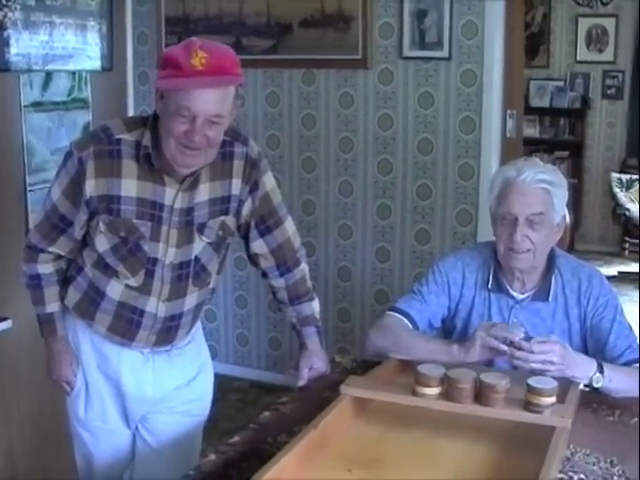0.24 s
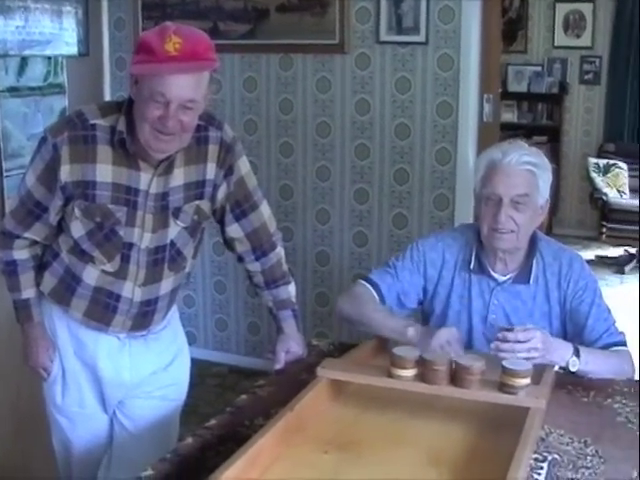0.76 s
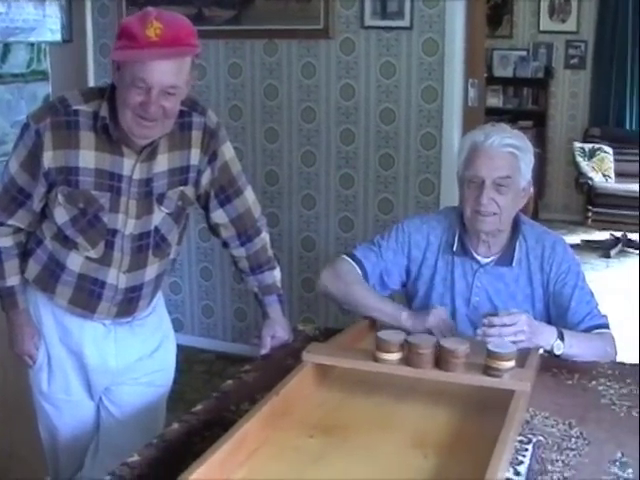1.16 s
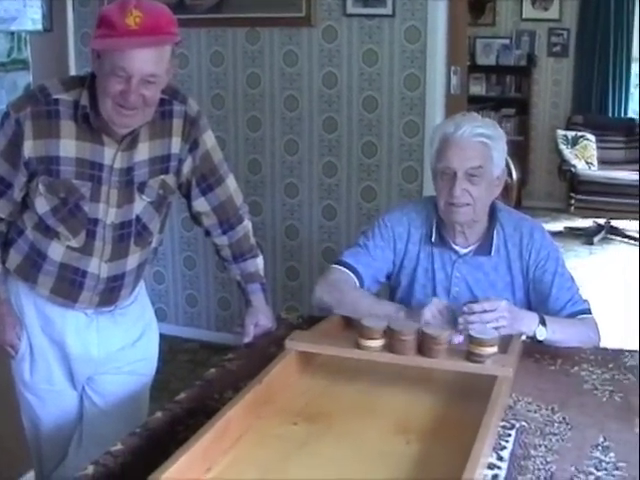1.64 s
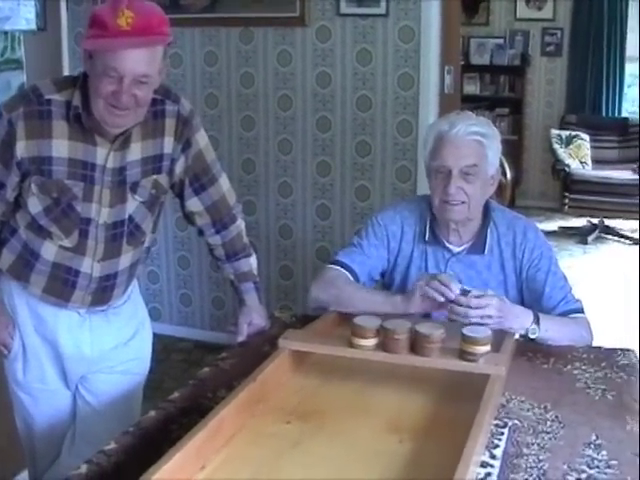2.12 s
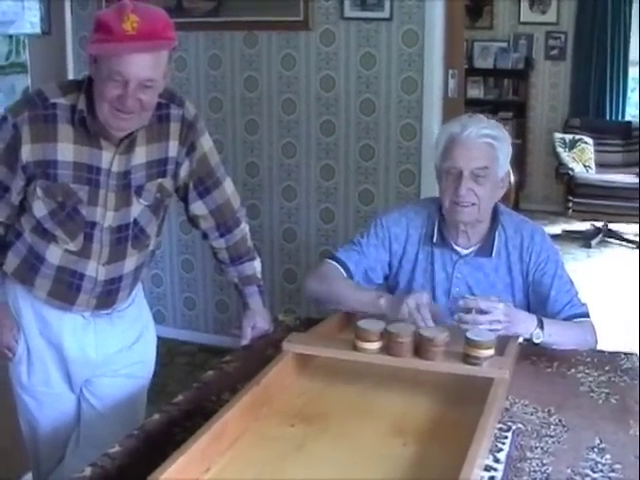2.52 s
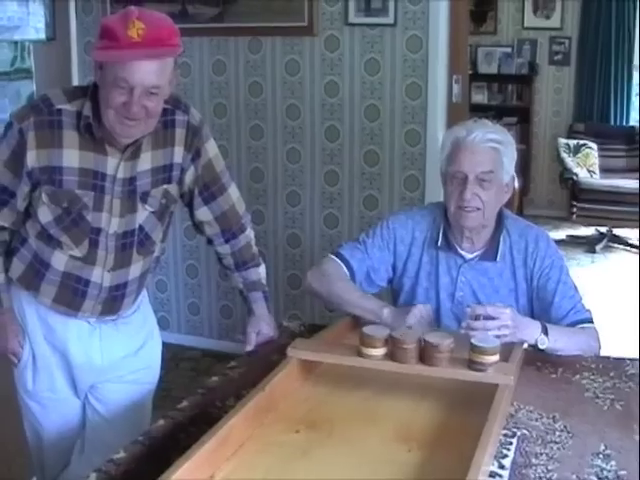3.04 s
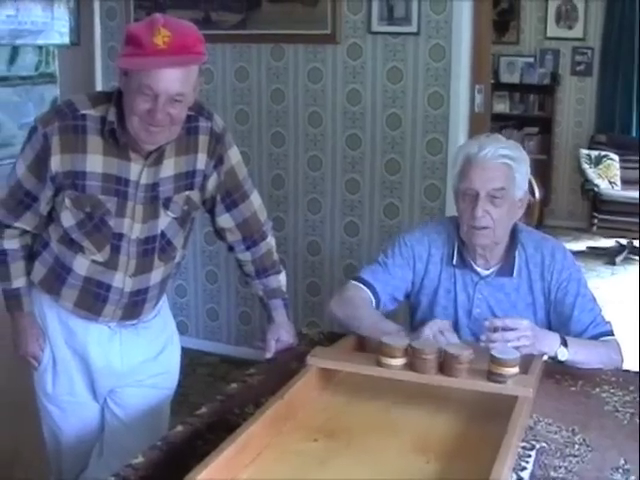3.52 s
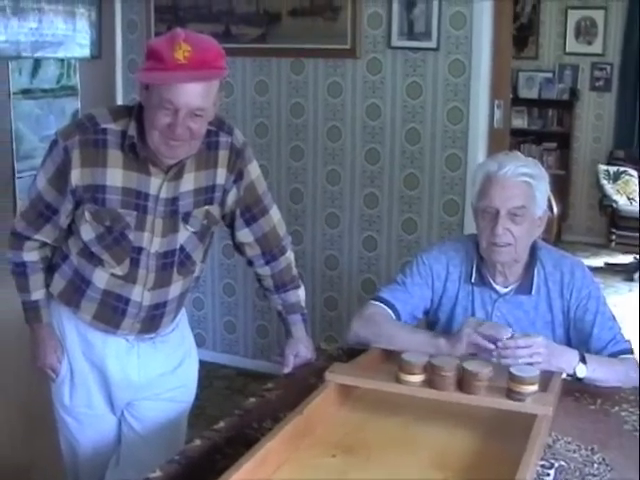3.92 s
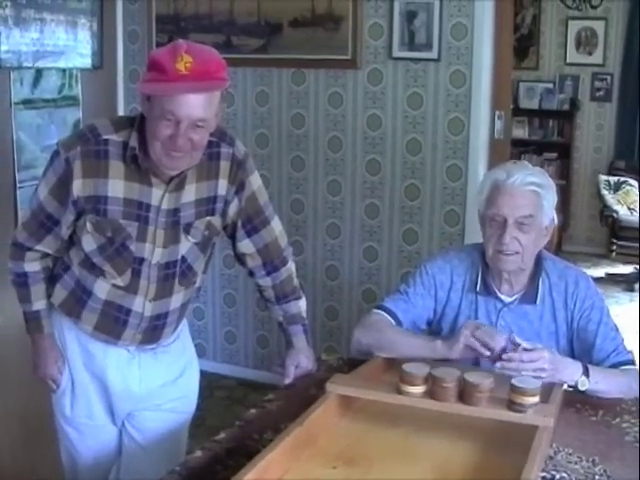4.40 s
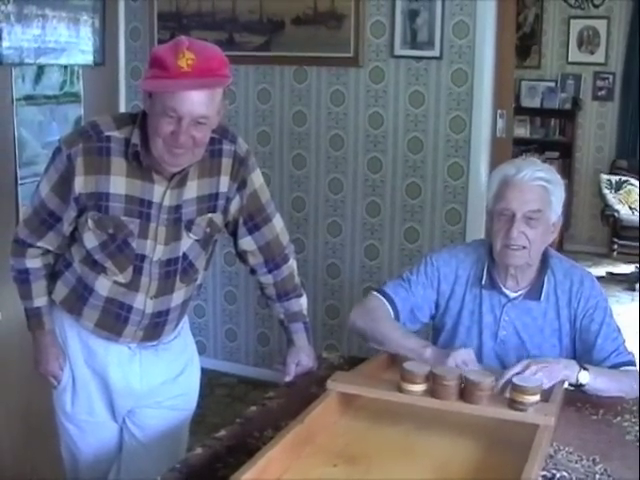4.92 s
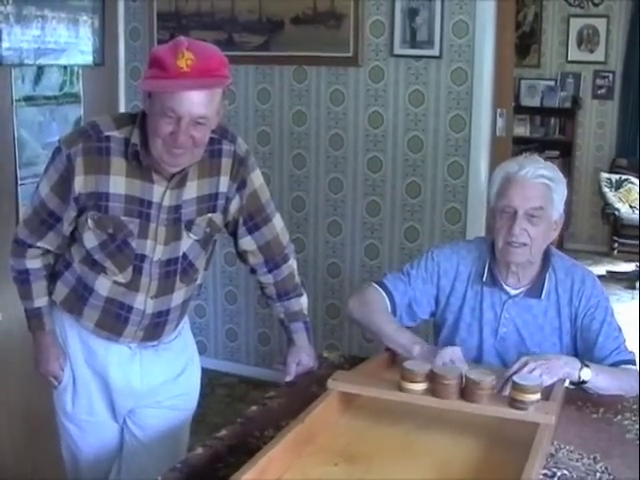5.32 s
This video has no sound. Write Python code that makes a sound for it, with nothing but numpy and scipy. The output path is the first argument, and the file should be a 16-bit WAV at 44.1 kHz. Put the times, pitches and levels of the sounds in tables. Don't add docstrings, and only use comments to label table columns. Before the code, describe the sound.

A small living room heard in stereo through a hissy tape camera with a faint steady whine. At the very start a wooden disc's slide fades within a third of a second, leaving faint hand rustle. A hard, woody clack with a low board ring lands at 0.95, followed by light taps and a soft push. From 1.4 to 1.9 a firm scraping slide rattles with crowded clacks, a tiny falling squeak and two split-second drop-outs; a double knock at 1.87 sends a disc running until about 2.1. After quiet, strong knocks hit at 2.74 and 2.88. Faint pushes and a brisk dry scrape follow from 3.0 to 3.7, with a brief drop-out just before clustered clacks at 3.75 and a run-out fading by 4.3. Two more sharp knocks come at 4.78 and 4.94, then a quick cluster from 5.2 to 5.3 and a short closing slide.

```python
import sys
import numpy as np
from scipy import signal
from scipy.fft import rfft, irfft, next_fast_len
from scipy.io import wavfile
from scipy.ndimage import uniform_filter1d

SR = 44100
rng = np.random.default_rng(int(sys.argv[2]) if len(sys.argv) > 2 else 0)


def gain_from_db(level_db):
    decades = np.asarray(level_db, float) / 20
    return 10 ** decades


def master_out(mix):
    frames = np.transpose(np.atleast_2d(mix))
    ceiling = np.clip(frames, -1, 1)
    pcm = np.round(ceiling * 32767).astype(np.int16)
    wavfile.write(sys.argv[1], SR, pcm)


N = 245195


def evened(x):
    return x / np.sqrt(np.mean(x ** 2) + 1e-20)


def peak_one(x):
    return x / abs(x).max()


def read(points, hz):
    f, value = np.transpose(points)
    return np.interp(np.log(hz + 1), np.log(f + 1), value)


def coloured(x, spectrum):
    hz = np.fft.rfftfreq(len(x), 1 / SR)
    return irfft(rfft(x) * gain_from_db(read(spectrum, hz)), len(x))


def add(mix, start, sound):
    part = mix[round(start * SR):][:len(sound)]
    part += sound[:len(part)]


# f/Hz, level/dB per Hz
HISS_SPECTRUM = [(15, -46.5), (25, -19), (43, -1), (130, -6), (624, -7), (1200, -11), (3000, -15),
                 (16000, -19.5)]
# f/Hz, likeness [0-1]
HISS_LIKENESS = [(60, 0), (180, 0.53), (550, 1), (1650, 0.07), (4970, 0), (15000, 0)]


def hiss():
    hz = np.fft.rfftfreq(1024, 1 / SR)
    a, b, c, d, patches = rng.standard_normal((N // 256 + 5, 513, 5)).T
    patches = evened(uniform_filter1d(uniform_filter1d(patches, 10, 0), 10, 1))
    same = np.clip(read(HISS_LIKENESS, hz), 0, 1)[:, None]
    left = a + 1j * b
    right = same * left + np.sqrt(1 - same ** 2) * (c + 1j * d)
    z = np.array([left, right]) * gain_from_db(read(HISS_SPECTRUM, hz)[:, None] + 1.3 * patches)
    noise = signal.istft(z, nperseg=1024, noverlap=768)[1][:, :N]
    return gain_from_db(-60) * noise / np.sqrt(np.mean(noise.mean(0) ** 2))


# f/Hz, level/dB rms
WHINE_TONES = [(1050, -77), (1200, -78), (1500, -79.5), (2100, -77), (2400, -75), (2850, -78), (3300, -80),
               (3450, -73), (3600, -82), (3750, -78), (7500, -81), (7800, -83), (8700, -84), (10800, -77),
               (15625, -76)]


def whine():
    t = np.arange(N) / SR
    flutter = evened(uniform_filter1d(uniform_filter1d(rng.standard_normal(N), 3000), 3000))
    out = np.zeros(N)
    for hz, db in WHINE_TONES:
        phase = 2 * np.pi * (hz * t + rng.random()) + 0.21 * flutter
        out += np.sqrt(2) * gain_from_db(db) * np.sin(phase)
    return out


# f/Hz, t60/s
ROOM_DECAY = [(250, 0.79), (600, 0.35), (1400, 0.39), (3700, 0.29), (9700, 0.47)]
# f/Hz, likeness [-1 to 1]
ROOM_LIKENESS = [(100, .9), (420, 1), (700, 0.94), (1200, 0.32), (2500, 0.51), (6000, -.2), (9000, -0.56),
                 (13000, -.2)]


def room_tail(length):
    taps = np.zeros((2, length))
    at = np.arange(60, length - 20, 20) + rng.integers(0, 20, (2, (length - 61) // 20))
    np.put_along_axis(taps, at, rng.choice([-1., 1.], at.shape), 1)
    hz, t, (a, b) = signal.stft(taps, SR, nperseg=256)
    half = np.arccos(np.clip(read(ROOM_LIKENESS, hz), -1, 1))[:, None] / 2
    middle, side = np.cos(half) * a, np.sin(half) * b
    z = np.array([middle + side, middle - side])
    decay = gain_from_db(-60 * t / read(ROOM_DECAY, hz)[:, None])
    tail = signal.istft(z * decay, SR, nperseg=256)[1]
    tail = tail * (np.arange(len(t) * 128 - 128) > 50)
    return tail / np.linalg.norm(tail[0])


def room(x):
    out = np.zeros((2, N))
    turn = np.arange(N) / SR * 4.3
    for k in range(3):
        tail = room_tail(SR // 2)
        share = np.sqrt(2 / 3) * np.cos(np.pi * (turn + k / 3))
        out += signal.fftconvolve((x * share)[None], tail, axes=1)[:, :N]
    return out


# f/Hz, phase/rad
LEFT_LEAD = [(100, 0), (2000, .1), (5000, .45), (7000, .9), (8900, 2.3), (10500, 1.2), (12000, 2.4),
             (16000, 0)]


def ports(x):
    hz = np.fft.rfftfreq(N, 1 / SR)
    half = np.exp(.5j * read(LEFT_LEAD, hz))
    return irfft(rfft(x) * np.array([half, 1 / half]), N)


def rubbing(per_s, spread_db, smooth):
    size_db = spread_db * np.minimum(rng.exponential(1, N), 4)
    happens = rng.random(N) < per_s / SR
    slips = happens * rng.choice([-1, 1], N) * gain_from_db(size_db)
    return evened(evened(slips) + smooth * rng.standard_normal(N))


RUMBLE_SPECTRUM = [(400, -19), (600, 8.5), (900, 3), (1400, 0.5), (2000, -16.5), (2800, -42.5)]
BOOM_SPECTRUM = [(200, -28), (300, -1), (400, 12), (520, -0.5), (700, -38)]
FACE_SPECTRUM = [(1300, -14), (2000, 4.5), (3000, -0.5), (4500, 3), (6000, -3.5), (7500, -46.5)]
GRAIN_SPECTRUM = [(4000, -30), (6000, -7), (7700, 0), (9600, -5), (10800, -22), (11800, -26), (12800, -15),
                  (13500, -24), (14200, -50)]
# boom level/dB against the rumble, grain dryness/dB, then rows of t/s, pressure level/dB, speed [0-1]
FREE_RUNS = [
    (-3, 1.5, [(0.0, -20, 0.07), (.034, -24, 0.2), (.1, -34.5, 0.38), (.18, -34.5, 0.33), (.224, -39, 0.19), (.262, -44, 0), (.36, -92, 0.8)]),
    (-11, -1.5, [(1.89, -25.5, 0.46), (1.92, -20, 0.28), (1.962, -30.5, 0.35), (2.024, -31.5, 0.32), (2.09, -32.5, 0.15), (2.154, -50, 0.15), (2.3, -87, 0.3)]),
    (-1.5, 5, [(3.78, -36, 0.6), (3.832, -25.5, 0.38), (3.85, -33, 0.6), (3.904, -33.5, 0.63), (3.915, -24.5, 0.14), (4.07, -43.5, 0.52), (4.1, -37.5, 0.3), (4.254, -56, 0), (4.4, -58.5, 0.07)]),
    (-11, -5, [(5.33, -14.5, 0.16), (5.35, -37, 0.58), (5.484, -58.5, .75), (5.56, -39, 0.76)]),
]
HAND_PUSHES = [
    (-12, -4, [(1.13, -43.5, .02), (1.21, -43.5, 0.67), (1.29, -35.5, 0.62), (1.33, -42.5, 0.62), (1.36, -47, 0.82), (1.38, -75, 0.27)]),
    (-9.5, -1.5, [(1.4, -40, 0.69), (1.416, -34.5, 0.68), (1.444, -32.5, 0.6), (1.484, -24, 0.43), (1.6, -24, 0.49), (1.68, -23.5, 0.44), (1.75, -22.5, 0.65), (1.796, -23, 0.34), (1.82, -21.5, 0.14)]),
    (-16, -4.5, [(2.95, -36.5, 0.14), (3.092, -49, 0.49), (3.186, -36, 0.74), (3.318, -39, 0.73), (3.36, -40, 0.68)]),
    (-3, 3, [(3.375, -43, 0.79), (3.398, -35.5, 1), (3.424, -35, 0.67), (3.586, -46, 1), (3.7, -37.5, 0.54)]),
    (-11, -4, [(5.0, -47.5, 0.87), (5.054, -65, 0.93), (5.128, -50.5, 0.61), (5.17, -39, 0.44)]),
]
HAND_REACHES = [
    (2.5, -.1, [(.45, -66.5, 0.25), (.65, -56.5, 0.08), (.78, -53.5, .02), (.86, -55.5, .02), (.92, -50.5, .02)]),
    (-1, -0.061, [(2.55, -79, .4), (2.668, -67, 0.27), (2.71, -51, 0.023)]),
    (12.5, -.1, [(4.42, -68, 0.21), (4.55, -75.5, 0.33), (4.718, -75, 0.31), (4.74, -63, .25)]),
]
# middle t/s, half length/s, level/dB
FINGER_BRUSHES = [
    (.33, .03, -66),
    (2.065, .04, -45),
    (2.42, .05, -59),
    (4.46, .06, -66),
]


def slides():
    hz, t, z = signal.stft(rubbing(1800, 2.5, .8), SR, nperseg=512, noverlap=384)
    rumble, boom, scrape, grain = (
        evened(gain_from_db(read(spectrum, hz)))[:, None]
        for spectrum in (RUMBLE_SPECTRUM, BOOM_SPECTRUM, FACE_SPECTRUM, GRAIN_SPECTRUM))
    field = np.zeros(z.shape)
    for boom_db, dry_db, rows in FREE_RUNS + HAND_PUSHES + HAND_REACHES:
        s, *columns = np.transpose(rows)
        pressure_db, speed = (np.interp(t, s, column) for column in columns)
        scrape_db = -15.5 + 26.5 * speed
        grain_db = dry_db - 24.5 + 34.5 * speed
        face_hz = 2800 + 1250 * speed
        fade_in = t - s[0] + 0.016 + (s[0] < .01)
        fade_out = s[-1] + 0.022 - t
        edge = np.clip(np.minimum(fade_in, fade_out) / 0.018, 0, 1)
        face = scrape * (1 + 0.94 * np.exp(-((hz[:, None] - face_hz) / 800) ** 2))
        face = face / np.sqrt((face ** 2).mean(0))
        parts = rumble + gain_from_db(boom_db) * boom + gain_from_db(scrape_db) * face + gain_from_db(grain_db) * grain
        add(field, 0, edge * gain_from_db(pressure_db) * parts)
    rocks = 1.494 + .06 * np.arange(4)[:, None]
    field = field * gain_from_db(8 * np.exp(-((t - rocks) / .011) ** 2).sum(0))
    brush = evened(np.exp(-((hz[:, None] - 7700) / 600) ** 2))
    for s, half_s, db in FINGER_BRUSHES:
        add(field, 0, gain_from_db(db) * brush * np.exp(-((t - s) / half_s) ** 4))
    patches = rng.standard_normal(z.shape[::-1]).T
    patches = evened(uniform_filter1d(uniform_filter1d(patches, 4, 0), 12, 1))
    return signal.istft(z * field * gain_from_db(2.8 * patches), SR, nperseg=512, noverlap=384)[1][:N]


def squeak():
    start_s, length_s, from_hz, to_hz = 1.4, 0.0245, 1550, 1228
    u = np.arange(round(length_s * SR)) / (length_s * SR)
    hz = from_hz + (to_hz - from_hz) * u
    uneven = 1 + 0.76 * np.cos(2 * np.pi * 4.5 * u)
    swell = np.sin(np.pi * u ** 3.0)
    out = np.zeros(N)
    add(out, start_s, gain_from_db(-22) * swell * uneven * np.sin(2 * np.pi * np.cumsum(hz) / SR))
    return out


def ring(modes, phases, seconds):
    hz, db, t60 = np.transpose(modes)[:, :, None]
    t = np.arange(round(seconds * SR)) / SR
    return (gain_from_db(db - 60 * t / t60) * np.sin(2 * np.pi * hz * t + phases[:, None])).sum(0)


# f/Hz, level/dB, t60/s
FLEX_MODES = [(347, -8.5, 0.2), (418.5, -1, 0.21), (464.6, 0.5, .13)]
# t/s, level/dB
SET_DOWNS = [
    (.944, -15.5),
    (2.737, -9.5),
    (3.744, -20),
    (4.775, -19.5),
    (5.196, -19.5),
]


def thuds():
    out = np.zeros(N)
    sound = peak_one(ring(FLEX_MODES, np.zeros(len(FLEX_MODES)), .3))
    for s, db in SET_DOWNS:
        add(out, s + 0.0013, gain_from_db(db) * sound)
    return out


def bent(x, spread_s):
    hz = np.fft.rfftfreq(x.shape[-1], 1 / SR)
    late = 2 * spread_s * (np.sqrt(1000 * hz) - hz / 10)
    return irfft(rfft(x) * np.exp(-2j * np.pi * late), x.shape[-1])


# f/Hz, level/dB, t60/s
BOARD_MODES = [(252, -21, 0.067), (287, -7, 0.15), (387, 4, 0.079), (745, 9, 0.068), (1350, 3, 0.13),
               (2080, -7, 0.2), (2800, -12.5, 0.05)]
# multiple of its pitch, level/dB
DISC_PARTIALS = [(1, 7.5), (.62, -1.5), (1.55, -6.5), (2.1, -8)]
# f/Hz, level/dB
PUSH_SPECTRUM = [(500, -16.5), (1000, -5.5), (1600, -1), (2500, -1), (4000, -5.5), (5500, -11.5),
                 (8000, -20.5), (11000, -43.5)]
# delay t/s, gain
RAIL_ECHOES = [(0, 0.94), (.0007, -1.1), (.0016, 0.87), (.0029, .5), (.0044, -0.22)]


def knock(peak_db, board_db, clack_db, tick_db, hz, rise_s, chance):
    t = np.arange(round(.3 * SR)) / SR
    table = np.array(BOARD_MODES)
    jitter, weight, phase = chance[:150].reshape(3, 50)
    mode_hz = np.linspace(16, 53, len(jitter)) ** 2 * (1 + .03 * jitter)
    mode_db = read(table[:, :2], mode_hz) + 1.1 * weight
    modes = np.transpose([mode_hz, mode_db, read(table[:, ::2], mode_hz)])
    board = ring(modes, 3 * phase, .3) * (1 - np.exp(-t / 0.00093))
    partials = [(hz * k, db, .005 + 8 * rise_s) for k, db in DISC_PARTIALS]
    disc = ring(partials, chance[150:154], .3)
    noise = chance[200:200 + len(t)]
    swell = 1 - np.exp(-(t / rise_s) ** 2)

    echoes = np.zeros(len(t))
    for (s, gain), c in zip(RAIL_ECHOES, chance[160:]):
        echoes += gain * np.exp(-((t - .0006 - s * (1 + .15 * c)) * SR) ** 2)
    push = coloured(echoes, PUSH_SPECTRUM) * (rise_s < .001)
    crackle = coloured(noise, PUSH_SPECTRUM) * np.exp(-t / (0.0052 + rise_s))
    tick_decay = np.exp(-t / (0.00074 + rise_s)) + 0.15 * np.exp(-t / .02)
    tick = coloured(noise[::-1], GRAIN_SPECTRUM) * tick_decay

    clack = 1.1 * push / (abs(push).max() + 1e-9)
    clack = clack + swell * (0.35 * peak_one(disc) + 0.38 * peak_one(crackle))
    rest = gain_from_db(board_db) * peak_one(swell * board) + gain_from_db(tick_db) * peak_one(swell * tick)
    room_to_spread = np.zeros(400)
    late = bent(np.array([np.append(part, room_to_spread) for part in (clack, rest)]), .003)
    return gain_from_db(peak_db) * (gain_from_db(clack_db) * peak_one(late[0]) + late[1])


# t/s, clack level/dB, board ring level/dB, disc pitch f/Hz
SHARP_BLOWS = [(0.944, -6.5, -5.5, 1895), (1.051, -22.5, -16.5, 1940), (1.091, -23, -17, 1910),
               (1.495, -9, -29, 2290), (1.671, -11.5, -23.5, 2400), (1.743, -18, -41, 2670),
               (1.755, -9, -44, 3130), (1.784, -14, -18, 3190), (1.866, -5, -12, 2250),
               (1.874, -9, -15, 2310), (1.915, -38, -38, 3500), (2.134, -37, -80, 2322),
               (2.737, -5.5, -1.5, 1880), (2.881, -3.5, -11, 2600), (3.018, -33.5, -46, 3650),
               (3.744, -10, -7, 2080), (3.759, -8, -36, 2700), (3.765, -9.5, -17, 2315),
               (3.84, -21.5, -14, 3070), (3.912, -20.5, -31, 2230), (3.941, -26, -33, 2600),
               (4.082, -36.5, -36.5, 2164), (4.775, -4, -5.5, 1960), (4.936, -4.5, -10, 2610),
               (5.196, -2.5, -8.5, 2380), (5.217, -9.5, -10, 2200), (5.302, -8, -13, 2020)]
GLANCING_BLOWS = [(1.053, -44, -33, 1080), (1.108, -27.5, -26.5, 1980), (1.386, -32, -33.5, 1600),
                  (1.408, -26, -44, 1266), (1.469, -20.5, -14, 2540), (1.494, -17.5, -18.5, 2600),
                  (1.557, -11, -24, 2400), (1.618, -13, -20.5, 2300), (1.668, -16, -24, 1288),
                  (2.751, -22, -14.5, 1260), (3.386, -25, -50, 2500), (3.395, -22, -47, 4440),
                  (5.338, -28.5, -17, 1390), (5.511, -36.5, -57, 1070)]
# from t/s, to t/s
DISCS_MOVING = [
    (1.4, 1.83),
    (1.9, 2.1),
    (3.75, 4.1),
]


def knocks():
    out = np.zeros(N)
    # blows, rise s, tick dB against the clack, tick dB per octave of disc pitch
    kinds = (SHARP_BLOWS, .0004, -25, 16), (GLANCING_BLOWS, .009, -25.5, 5)
    for table, rise_s, tick_db, slope_db in kinds:
        chances = rng.standard_normal((len(table), SR // 3))
        for (s, clack_db, board_db, hz), chance in zip(table, chances):
            moving = any(a < s < b for a, b in DISCS_MOVING)
            top_db = tick_db + slope_db * np.log2(hz / 2000) + 13 * moving
            sound = knock(clack_db, board_db - clack_db, 0, top_db, hz, rise_s, chance)
            add(out, s - rise_s / 2 - .0009, sound)
    return out


def scene():
    hits = knocks() + thuds() + squeak()
    rubs = slides()
    return gain_from_db(2.5) * hits + ports(gain_from_db(-5.0) * rubs) + room(gain_from_db(-2.5) * hits + gain_from_db(-8.0) * rubs)


def muffled(x):
    return signal.sosfilt(signal.butter(8, 14300, fs=SR, output="sos"), x)


# spacing f/Hz, zero radius, pole radius
NOTCH_COMBS = [(600, 0.85, 0.73), (300, 1, 0.86)]


def notched(x):
    size = next_fast_len(N + SR // 2)
    hz = np.fft.rfftfreq(size, 1 / SR)
    gain = (1j * hz / 230 / (1 + 1j * hz / 230)) ** 3
    for spacing, zero, pole in NOTCH_COMBS:
        delay = np.exp(-2j * np.pi * hz / round(spacing, -2))
        gain = gain * (1 - min(zero, .99) * delay) / (1 - min(pole, .98) * delay)
    return irfft(rfft(x, size) * gain, size)[:, :N]


# sound fails t/s, residue fails t/s, sound returns t/s, residue level/dB, thump
# level/dB
BRIEF_GAPS = [
    (1.7045, 1.728, 1.7435, -36, -46),
    (1.8245, 1.8465, 1.8625, -27, -50),
    (3.7035, 3.727, 3.7435, -29, -50),
]


def dropped(x):
    t = np.arange(N) / SR
    whole, residue, thump = np.ones(N), np.zeros(N), np.zeros(N)
    for fails, gone, back, db, thump_db in BRIEF_GAPS:
        whole *= 1 - np.clip(np.minimum(t - fails, back - t) / 0.00071, 0, 1)
        lingering = np.interp(t, [fails - .002, fails, gone - .003, gone], [0.018, 0.27, 1.0, 0])
        residue += gain_from_db(db) * lingering
        add(thump, back, gain_from_db(thump_db) * np.hanning(round(0.0064 * SR)))
    dull = signal.sosfilt(signal.butter(4, 2600, fs=SR, output="sos"), x)
    return whole * x + thump + residue * dull


def roll_off(x):
    return signal.sosfilt(signal.butter(12, 16390, fs=SR, output="sos"), x)


def record(dry):
    loud = notched(np.tanh(dry / .95) * .95)
    low_band = signal.butter(2, [30, 220], "bandpass", fs=SR, output="sos")
    thump = signal.sosfilt(low_band, loud.mean(0) ** 2)
    tape = muffled(loud + gain_from_db(-28) * thump + hiss()) + whine()
    return roll_off(dropped(tape))


dry = scene()
out = record(dry)
master_out(out)
```